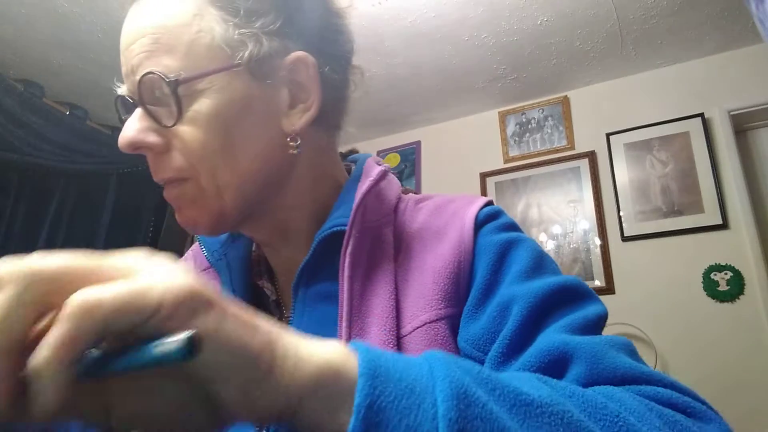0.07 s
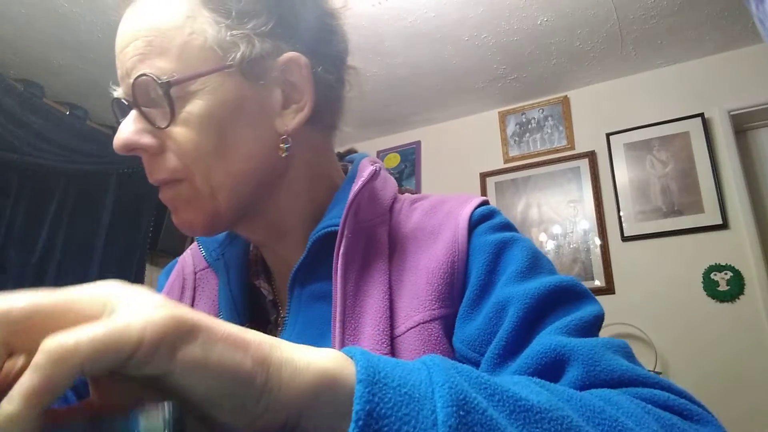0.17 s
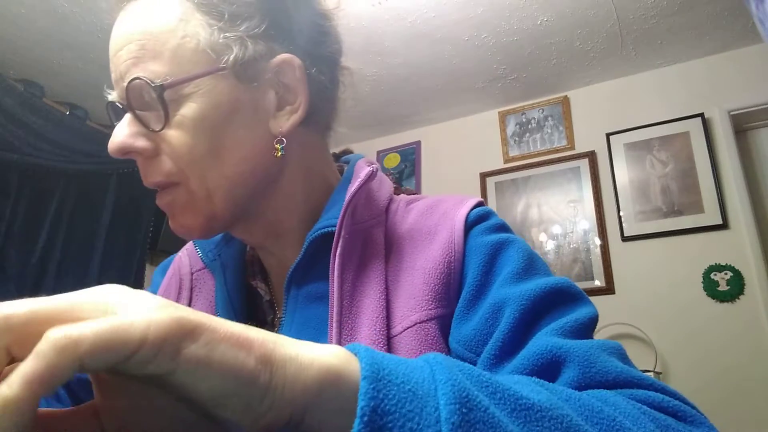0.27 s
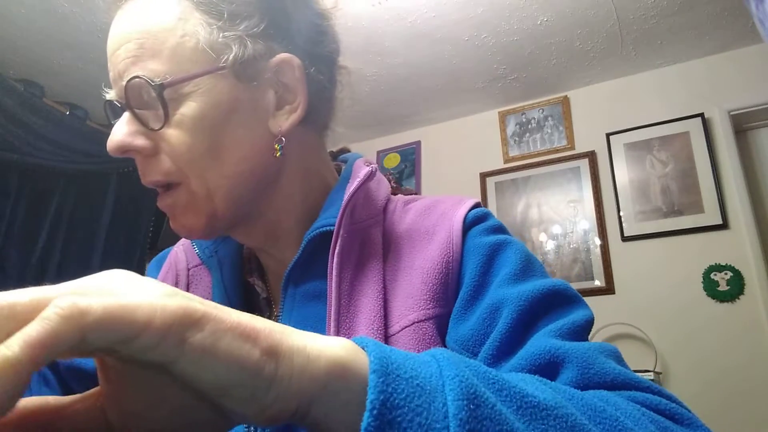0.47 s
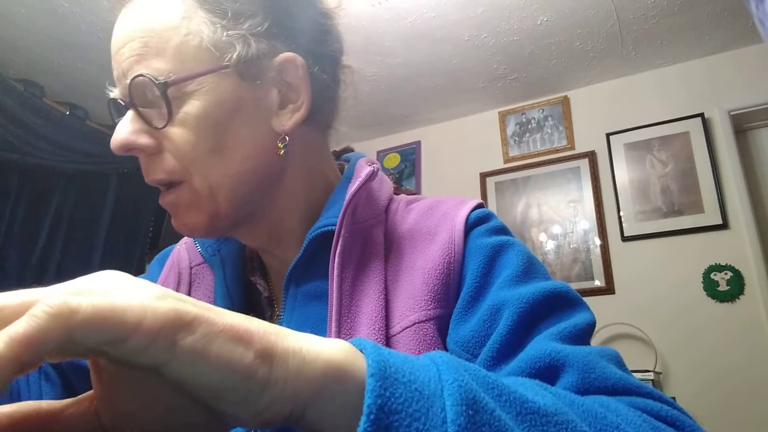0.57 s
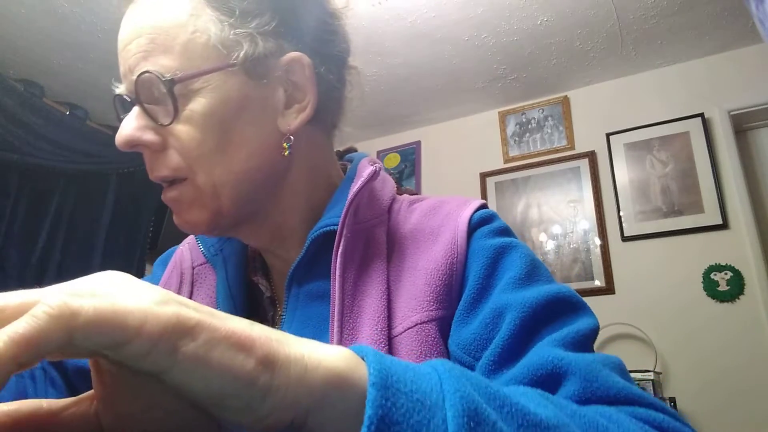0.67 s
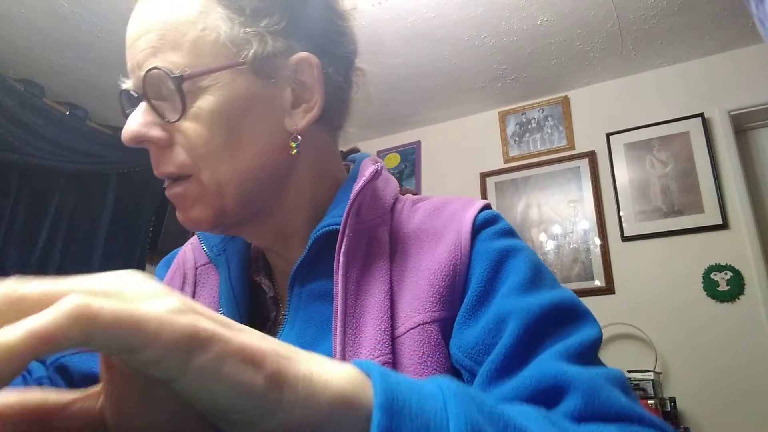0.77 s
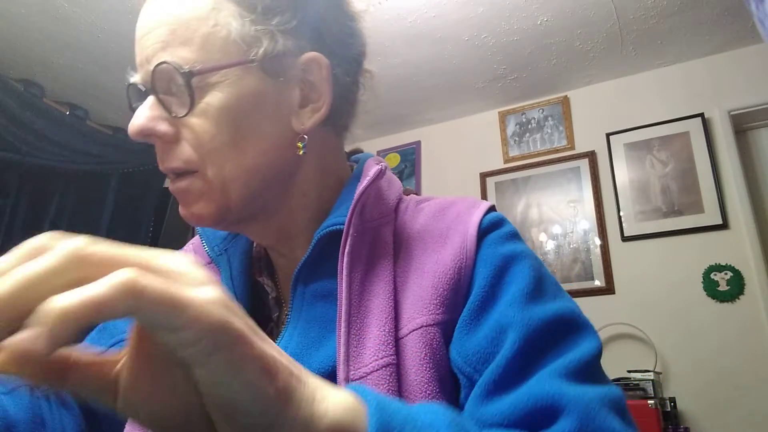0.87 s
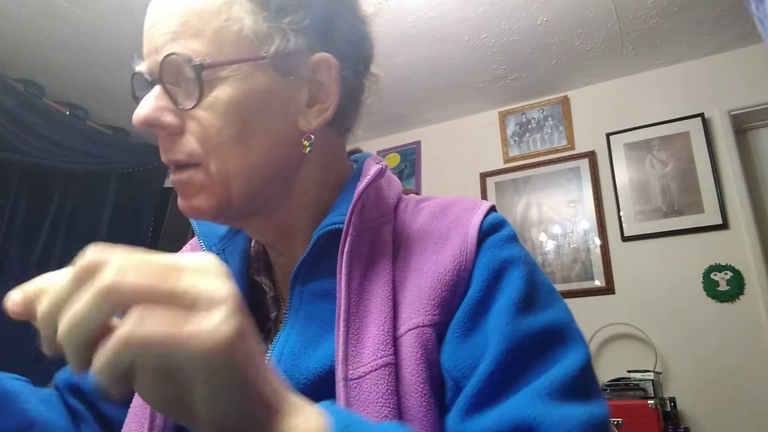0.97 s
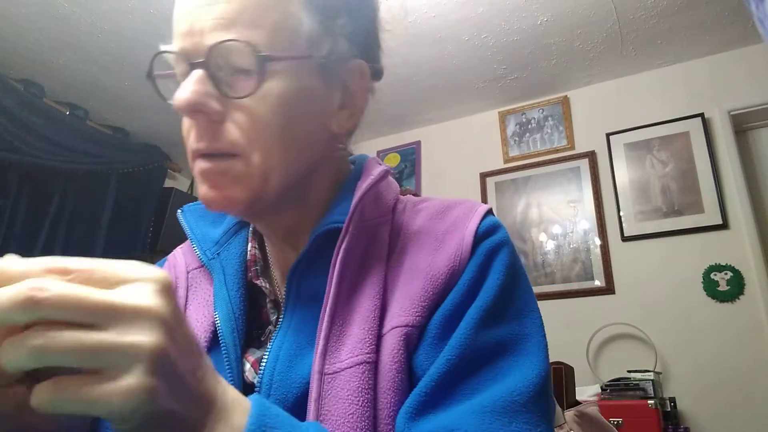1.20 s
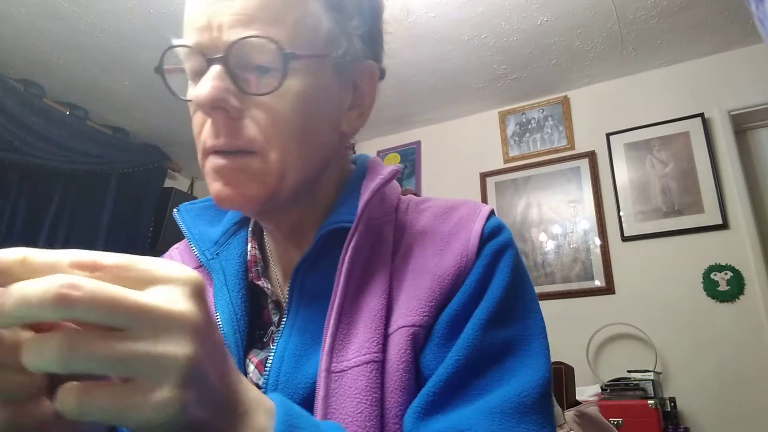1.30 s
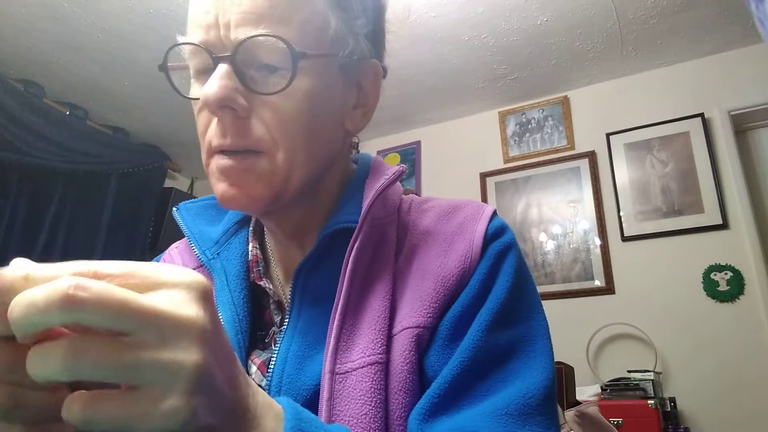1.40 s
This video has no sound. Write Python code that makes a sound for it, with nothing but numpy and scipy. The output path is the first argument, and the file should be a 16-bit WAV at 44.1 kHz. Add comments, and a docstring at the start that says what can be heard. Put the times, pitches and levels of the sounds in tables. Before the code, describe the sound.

A small hand tool clicks lightly, then lands on a desk with one hard clack and a brief metallic clatter. Fingers softly tap and rub a package afterward, close to the microphone in a quiet room with a low hum.

```python
"""At a desk in a quiet room, a small hand tool clicks and is set down close to a phone.
Its catch snaps lightly, then comes one hard clack and a short clatter: each contact
knocks the handle, rings the metal and thumps the desk. A hand bumps the desk softly,
and fingers tap and rub a package. A low, fan-like noise fills the room throughout."""
import sys
import numpy as np
from scipy import signal
from scipy.fft import rfft, irfft
from scipy.io import wavfile

SR = 44100
rng = np.random.default_rng(int(sys.argv[2]) if len(sys.argv) > 2 else 0)


def unload_wav(signal):
    """Save mono or channel-first audio to the path in sys.argv[1] as 16-bit WAV at rate SR, clipped to [-1, 1]."""
    wavfile.write(
        sys.argv[1],
        SR,
        np.round(np.clip(np.atleast_2d(signal).T, -1, 1) * 32767).astype(np.int16),
    )


N = 63945


def undb(db):
    """Turn decibels into a gain."""
    return 10 ** (np.asarray(db) / 20)


def unit(x):
    """Scale to an average energy of 1 per channel."""
    return x / np.sqrt(np.mean(np.sum(x ** 2, axis=-1)) + 1e-18)


def hit(x, level_db):
    """Scale a hit: its level is that of its energy packed into 5 ms."""
    return unit(x) * undb(level_db) * np.sqrt(.005 * SR)


def curve_at(points, hz):
    """Read between (frequency, value) points, giving each octave equal room."""
    points = np.array(points, float)
    return np.interp(np.log(hz + 1e-9), np.log(points[:, 0]), points[:, 1])


def pulse(colour, pitch_scale=1, size=4096):
    """A short pulse with the given colour: how strong its low and high pitches are."""
    hz = np.arange(size // 2 + 1) * SR / size
    cepstrum = irfft(np.log(undb(curve_at(colour, hz / pitch_scale))))
    # pack the energy at the start of the pulse (minimum phase)
    cepstrum[1:size // 2] *= 2
    cepstrum[size // 2 + 1:] = 0
    return unit(irfft(np.exp(rfft(cepstrum))))


def convolve(x, response):
    """Filter x: every sample sets off a copy of the response."""
    return signal.fftconvolve(np.atleast_2d(x), np.atleast_2d(response), axes=-1)[:, :N]


def fade(fade_s):
    """A smooth decay that falls 60 dB in fade_s seconds."""
    return np.exp(-np.log(1000) * np.arange(N) / SR / fade_s)


def noise(width):
    """Stereo hiss: at width 0 both sides match, at 1 they are unrelated."""
    mid, side = rng.standard_normal((2, N))
    return np.array([mid + width * side, mid - width * side]) / np.hypot(1, width)


def pan(db):
    """Gains that make the left side db louder than the right."""
    return undb(np.array([[db], [-db]]) / 2)


def add(out, start_s, x):
    """Mix x into out, beginning at start_s."""
    start = int(start_s * SR)
    n = min(x.shape[-1], N - start)
    out[:, start:start + n] += x[..., :n]


# colour of the room noise: pitch_hz, level_db
ROOM_COLOUR = [(25, -28), (60, -15), (130, -9), (190, -16), (245, 4.5), (315, -12.5), (420, -13), (520, -3),
               (640, 0.5), (780, -8), (910, -5.5), (1070, -7.5), (1300, -22.5), (1800, -19), (2100, -26.5),
               (3300, -28), (5000, -38), (9000, -48), (15500, -45)]
# the phone turns the room noise down after the loud clacks, then it comes back up: time_s, level_db
PHONE_GAIN = [(0, -48), (.22, -48.5), (.45, -52.5), (.78, -48.5), (.98, -50), (1.2, -50.5), (1.35, -46.5),
              (1.45, -46)]


def room_noise():
    """A low, fan-like rush with a hum near 245 Hz; its level flutters slightly."""
    t = np.arange(N) / SR
    gain_db = np.interp(t, *np.array(PHONE_GAIN).T)
    flutter_db = 2 * np.interp(t, np.linspace(0, t[-1], num=40), rng.standard_normal(40))
    rush = convolve(noise(width=0.24), pulse(ROOM_COLOUR))
    return rush * undb(gain_db + flutter_db) * pan(db=1.4)


# bumps of the hand: start_s, level_db
BUMPS = [(.08, -64), (.45, -40), (.526, -41), (0.673, -38), (0.796, -47.5), (.822, -39), (0.843, -39.5)]
# colour of a bump: pitch_hz, level_db
BUMP_COLOUR = [(25, -42), (45, -31), (75, -11), (170, 10.5), (260, -1.5), (500, -23.5), (1500, -71)]
DESK_PAN_DB = 3.5


def hand_bumps(dull):
    """A soft hand bumps the desk, giving low thuds."""
    for start_s, level_db in BUMPS:
        add(dull, start_s, hit(pulse(BUMP_COLOUR), level_db) * pan(DESK_PAN_DB))


def crack(colour, fade_s):
    """A few milliseconds of dense, fast-dying vibration."""
    burst = noise(width=0.66) * fade(fade_s)
    return convolve(burst[:, :N // 8], pulse(colour))


# snaps of the catch: start_s, level_db
CATCH_SNAPS = [(.124, -33.5), (0.1285, -35.5)]
# colour of the catch: pitch_hz, level_db
CATCH_COLOUR = [(600, -45), (1050, -10), (1380, 5.5), (1650, -16), (2050, -22), (2350, -3), (3000, 2),
                (3800, -3.5), (4600, -8), (7000, -21), (8700, -28), (9300, -11), (9900, -28), (10800, -14),
                (12700, -30), (14600, -20), (16500, -46)]


def tool_catch(bright):
    """The tool's catch snaps: two light cracks, almost at once."""
    for start_s, level_db in CATCH_SNAPS:
        add(bright, start_s, hit(crack(CATCH_COLOUR, fade_s=0.018), level_db))


def knock(colour, pitch_hz):
    """One damped push; the surface delays the part near its own pitch, so it swings a few times."""
    feedback = signal.iirpeak(pitch_hz, Q=1.5, fs=SR)[1]  # a higher Q swings longer
    return signal.lfilter(feedback[::-1], feedback, pulse(colour, pitch_hz))


# colours of a sharp snap and a thinner, higher tick: pitch_hz, level_db
SNAP_COLOUR = [(900, -48), (1900, -10), (2400, 7), (3250, 10.5), (3900, -1.5), (4800, -20.5), (9000, -40),
               (16000, -45)]
TICK_COLOUR = [(2000, -48), (4500, 10), (6200, 10), (8000, 6), (10500, 5), (12700, -0.5), (14800, -6),
               (16500, 5.5)]


def contact_click(snap_db, tick_db):
    """Two surfaces meet with a snap and a tick together."""
    snap = hit(crack(SNAP_COLOUR, fade_s=0.013), snap_db)
    tick = hit(crack(TICK_COLOUR, fade_s=0.021), tick_db)
    return snap + tick


def ring(tones, width):
    """A struck object rings with its own fading tones, a little differently each time."""
    t, out = np.arange(N // 2) / SR, 0
    for pitch_hz, level_db, fade_s in tones:
        detune, turn = rng.standard_normal(2)
        spread = width * min(pitch_hz / 500, 1)  # low tones get less random left-right phase spread
        phase = spread * turn * np.array([[1], [-1]])
        tone = np.sin(2 * np.pi * pitch_hz * (1 + 0.0013 * detune) * t + phase)
        out = out + undb(level_db) * fade(fade_s)[:len(t)] * tone
    return out


# the tool's contacts with the desk: start_s, pitch_hz, knock_db, snap_db, tick_db, metal_db, desk_db
CLACKS = [(0.2434, 1070, -14.5, -32, -45, -41, -40.5), (.2462, 1350, -33, -31.5, -34, -47.5, -68),
          (0.3294, 788, -18, -44, -43, -62, -33), (.3325, 495, -25.5, -51, -40.5, -38.5, -23),
          (0.3392, 1040, -20.5, -35.5, -35.5, -46.5, -25), (.3475, 1080, -45, -43, -37, -51, -42),
          (.367, 890, -28, -43.5, -67, -55, -31.5), (0.3712, 496, -31, -52, -63, -61, -34),
          (.378, 740, -31, -59, -72, -60, -29.5), (.389, 1490, -41.5, -50, -47.5, -56.5, -43),
          (.443, 674, -39, -87, -67, -70, -42.5)]
# colour of the handle's knock: pitch_multiple, level_db
CLACK_COLOUR = [(.03, -20), (.12, -29), (.19, -9), (.3, -8), (.5, -4), (.88, 0.5), (1.35, -3), (1.7, -7),
                (2.2, -15), (3.2, -19.5), (6, -43.5)]
# ringing tones of the metal and of the desk: pitch_hz, level_db, fade_s
METAL_TONES = [(3321, -2, .1), (3581, -4, .1), (4280, -11, .4), (4950, -9, .18), (5800, -8, .14),
               (5925, -10, .2), (6283, -11, .13), (8235, 1, .18), (9255, -1, .15), (11050, -13, .13),
               (13220, -11, .14), (14520, -14, .11)]
DESK_TONES = [(85.4, -5.5, 0.24), (136, -22, 0.18), (203.3, 0.5, 0.18), (276.7, 2, 0.12), (353, -19, 0.14),
              (494, -6, 0.14), (560, -36, 0.18), (652, -12.5, 0.18), (755.7, 0, .1), (889, -13, 0.11),
              (1116, -10.5, 0.18), (1440, -12.5, 0.15)]


def tool_clatter(dull, bright):
    """Each contact knocks the handle, thumps the desk, clicks and rings the metal."""
    for start_s, pitch_hz, knock_db, snap_db, tick_db, metal_db, desk_db in CLACKS:
        add(dull, start_s, hit(knock(CLACK_COLOUR, pitch_hz), knock_db))
        add(dull, start_s, hit(ring(DESK_TONES, width=1), desk_db) * pan(DESK_PAN_DB))
        add(bright, start_s, contact_click(snap_db, tick_db))
        add(bright, start_s, hit(ring(METAL_TONES, width=0.89), metal_db))


# taps on the package: start_s, pitch_hz, knock_db, snap_db, tick_db
TAPS = [(0.3098, 820, -44, -76, -85), (.521, 864, -44.5, -58.5, -72), (0.5516, 1450, -40, -45, -92),
        (.567, 640, -40, -79, -96), (0.591, 600, -46.5, -72, -90), (0.6002, 880, -41.5, -75, -98),
        (0.6231, 910, -38.5, -60.5, -87), (.659, 560, -53, -57, -63), (0.676, 514, -55, -56.5, -66),
        (.692, 790, -44, -59.5, -92), (.7105, 604, -38, -57, -67), (0.7159, 810, -39.5, -86, -91),
        (0.721, 770, -38.5, -64, -90), (.822, 636, -42, -61, -73), (1.09, 880, -39, -84, -97)]
# colour of a tap: pitch_multiple, level_db
TAP_COLOUR = [(.04, -55), (.12, -35), (.3, -4.5), (.55, -6), (.9, 1.5), (1.3, 0), (1.9, -19), (3.2, -35),
              (6, -72)]


def finger_taps(dull, bright):
    """A fingertip lands on the package with a soft knock and a faint click."""
    for start_s, pitch_hz, knock_db, snap_db, tick_db in TAPS:
        add(dull, start_s, hit(knock(TAP_COLOUR, pitch_hz), knock_db))
        add(bright, start_s, contact_click(snap_db, tick_db))


# rubs on the package: start_s, length_s, scrape_db, crinkle_db
RUBS = [(0.538, 0.097, -51, -79), (0.636, 0.054, -46.5, -59.5), (0.678, 0.073, -44, -68.5),
        (0.796, .06, -52.5, -64.5), (0.948, 0.08, -54, -77), (1.378, 0.023, -77, -60.5)]
# colours of the low scrape and the crisp crinkle: pitch_hz, level_db
SCRAPE_COLOUR = [(100, -6.5), (260, -7), (600, 8), (1100, -8), (1700, -8), (2300, -17.5), (3400, -27),
                 (5000, -30.5), (12000, -82)]
CRINKLE_COLOUR = [(800, -21), (1800, 16), (3300, 11), (4800, 0), (7300, 2), (9000, -27), (15000, -27)]
SLIPS_PER_S, SLIP_SPREAD_DB = 2300, 1


def finger_rubs(dull, bright):
    """A rub is a swell of tiny random slips that make the package scrape and crinkle."""
    for start_s, length_s, scrape_db, crinkle_db in RUBS:
        n = int(length_s * SR)
        slips = (rng.random(N) < SLIPS_PER_S / SR) * rng.choice([-1, 1], N)
        slips = slips * undb(SLIP_SPREAD_DB * rng.exponential(size=N))
        swell = np.sqrt(np.hanning(n))
        rub = unit(slips[:n] * swell) * np.sqrt(n)
        add(dull, start_s, undb(scrape_db) * convolve(rub, pulse(SCRAPE_COLOUR)))
        add(bright, start_s, undb(crinkle_db) * convolve(rub, pulse(CRINKLE_COLOUR)))


def echoes(level_db, fade_s, rise_s):
    """A blur of reflections that builds up and dies away."""
    blur = noise(width=0.31) * fade(fade_s) * (1 - fade(rise_s)) ** 2
    return undb(level_db) * unit(blur)


def two_microphones(x, left_lead):
    """The phone's left and right microphones hear the same wave out of step."""
    hz = np.arange(N + 1) * SR / (2 * N)
    phase = curve_at(left_lead, hz) * np.array([[1], [-1]]) / 2
    return irfft(rfft(x, 2 * N) * np.exp(1j * phase))[:, :N]


# how far the left microphone is ahead, for desk sounds and for room noise: pitch_hz, lead_radians
DESK_LEAD = [(8, 0), (35, 2.7), (110, 2.7), (190, 1.4), (300, 1.3), (600, .9), (1300, .5), (1700, 1.9),
             (2200, 3.1), (3200, 5.6), (4400, 9), (5400, 12), (7800, 18), (16000, 26)]
ROOM_LEAD = [(8, 0), (35, 2.6), (120, 2.5), (200, 1.5), (400, 1.4), (700, .8), (1300, .2), (1700, 2),
             (2250, 3.2), (3100, .6), (4400, -3.1), (5400, -6.1), (9000, -16), (16000, -32)]


def scene():
    """Tool and hand in a small furnished room; dull and bright sounds get their own echoes."""
    dull, bright = np.zeros((2, 2, N))
    hand_bumps(dull)
    tool_catch(bright)
    tool_clatter(dull, bright)
    finger_taps(dull, bright)
    finger_rubs(dull, bright)
    bright *= pan(db=2)
    nearby = echoes(level_db=-8.5, fade_s=0.027, rise_s=0.005)  # off the desk and the body
    dull_walls = echoes(level_db=-18.5, fade_s=0.16, rise_s=0.01)
    bright_walls = echoes(level_db=-12, fade_s=0.16, rise_s=0.02)
    reflected = convolve(dull, nearby + dull_walls) + convolve(bright, bright_walls)
    desk_sounds = two_microphones(dull + bright + reflected, DESK_LEAD)
    return desk_sounds + two_microphones(room_noise(), ROOM_LEAD)


LOW_CUT_HZ, HIGH_CUT_HZ = 45, 15900


def record(dry):
    """The phone cuts the deepest rumble and the highest treble."""
    low_cut = signal.butter(2, LOW_CUT_HZ, "high", fs=SR, output="sos")
    high_cut = signal.ellip(10, .2, 80, HIGH_CUT_HZ, fs=SR, output="sos")
    return signal.sosfilt(high_cut, signal.sosfilt(low_cut, dry))


dry = scene()
out = record(dry)
unload_wav(out)
```